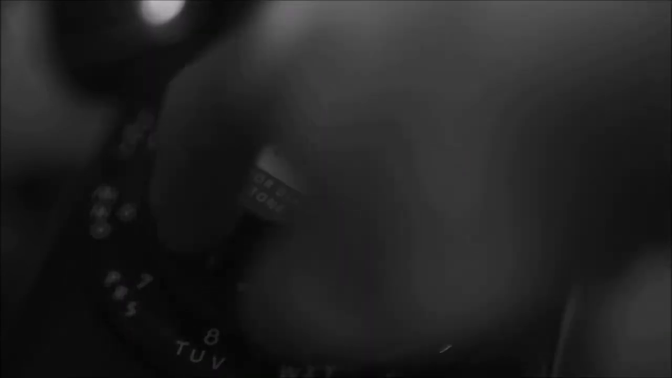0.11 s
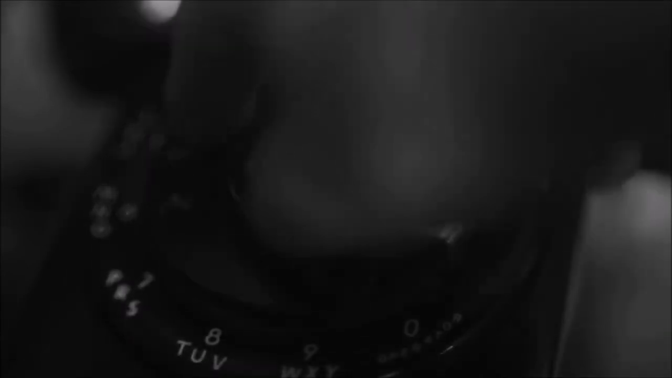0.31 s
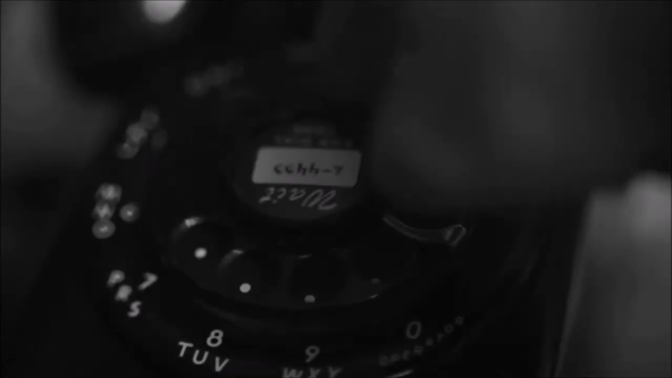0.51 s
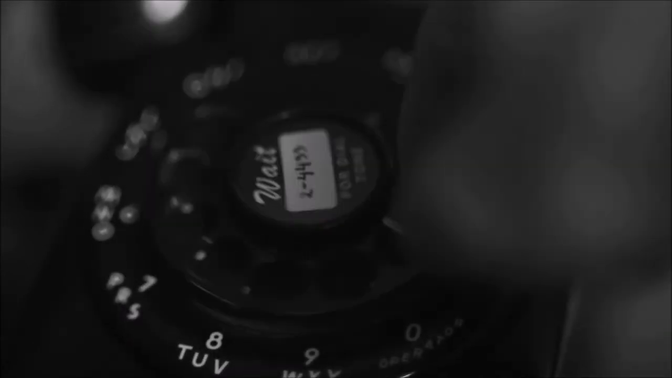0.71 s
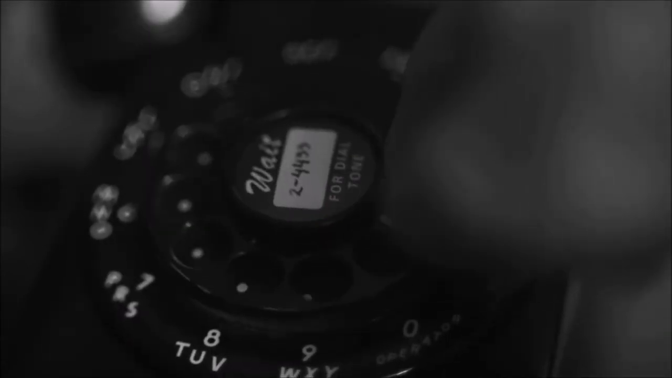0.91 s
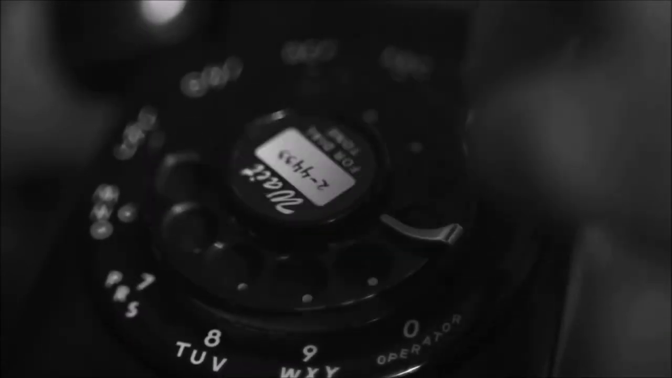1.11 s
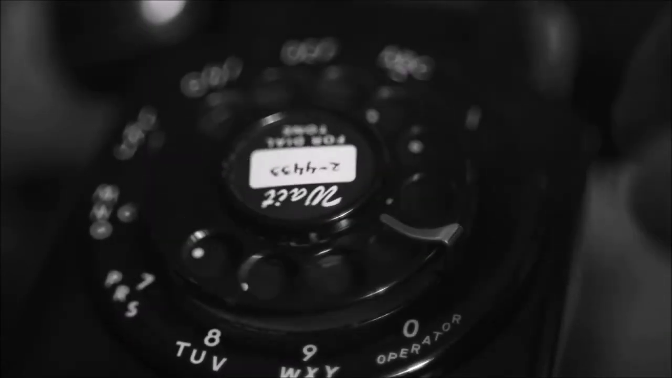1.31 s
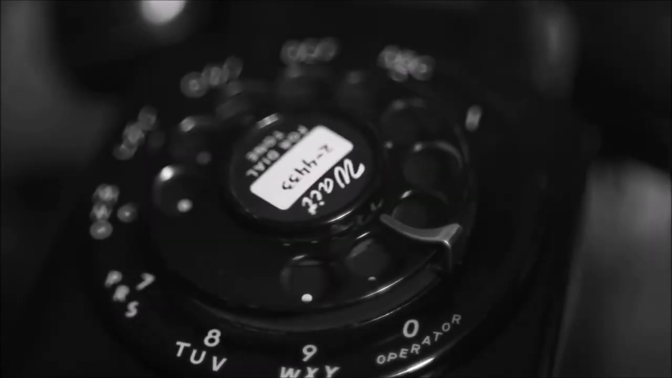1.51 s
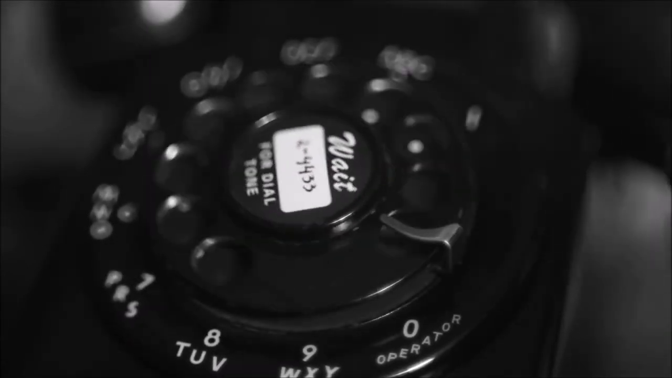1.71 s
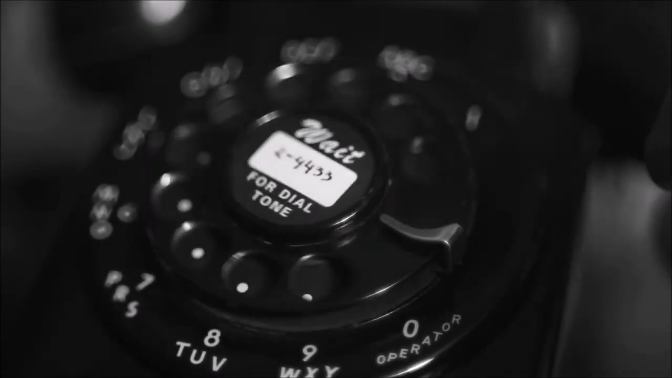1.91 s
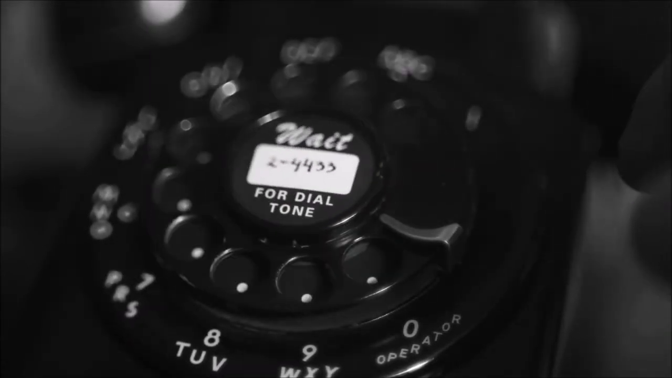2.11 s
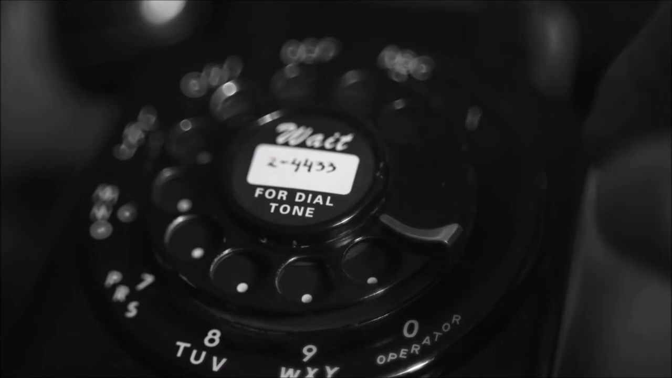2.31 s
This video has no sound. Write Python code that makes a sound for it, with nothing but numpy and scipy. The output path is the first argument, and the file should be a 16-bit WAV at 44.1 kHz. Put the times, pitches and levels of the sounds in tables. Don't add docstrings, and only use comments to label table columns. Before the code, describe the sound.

A rotary telephone dial heard very close in a small room: a finger winds it with rattling, quickening clicks, it cracks against the stop, then whirrs back with nine even clicks and a ringing metal clack.

```python
import sys
import numpy as np
from scipy import signal
from scipy.fft import rfft, irfft, next_fast_len
from scipy.io import wavfile
from scipy.ndimage import uniform_filter1d, map_coordinates

SR = 44100
rng = np.random.default_rng(int(sys.argv[2]) if len(sys.argv) > 2 else 0)


def attenuation_scalar(level_db):
    decades = np.asarray(level_db, float) / 20
    return 10 ** decades


def inscribe(sig):
    pcm = np.round(np.clip(np.atleast_2d(sig).T, -1, 1) * 32767)
    wavfile.write(sys.argv[1], SR, pcm.astype(np.int16))


N = 103635

# frequency in Hz, width in Hz, level in dB.
CASE = [(329, 91, -9), (423.5, 33, 3), (539.3, 40.3, 2.5), (652.4, 22.6, -4.5), (779, 36.6, -5)]
# frequency in Hz, width in Hz, level in dB.
PLATE = [(920, 470, -10), (1198, 184, -0.5), (1457, 67, -1), (1586, 82, -1), (1720, 72, 0), (1837, 67, 2.5),
         (2170, 197, -9.5), (2834, 440, -14)]
# frequency in Hz, level in dB per Hz.
SPRING = [(1200, -12.5), (2200, -1.5), (3550, -8), (6470, -0.5), (8190, -7.5), (8850, -4), (9740, -6),
          (12800, -5.5), (16000, -16)]


def unit(x):
    return x / np.sqrt(np.mean(x ** 2) + 1e-20)


def along(points, hz):
    f, v = np.transpose(points)
    return np.interp(np.log(hz + 1), np.log(f + 1), v)


def wobble(rate, count=N):
    knots = rng.standard_normal(int(count * rate / SR) + 4)
    return map_coordinates(knots, [np.arange(count) * rate / SR])


def filtered(x, response):
    m = next_fast_len(N + SR // 2)
    return irfft(rfft(x, m) * response(np.fft.rfftfreq(m, 1 / SR)), m)[:N]


def resonances(body):
    def response(f):
        total = 0
        for k, (centre, width, db) in enumerate(body):
            loss = 1j * f * width
            total = total + (-1) ** k * attenuation_scalar(db) * loss / (centre * centre - f * f + loss)
        return total
    return response


def coloured(spectrum):
    return unit(filtered(rng.standard_normal(N), lambda hz: attenuation_scalar(along(spectrum, hz))))


def bursts(events, rise_s, t60_s, chatter_db, chatter_s):
    blows, u = np.zeros(N), np.arange(SR // 3) / SR
    places = [min(round(e[0] * SR), N - 1) for e in events]
    np.add.at(blows, places, attenuation_scalar([e[1] for e in events]))
    rise = (1 - np.exp(-u / rise_s)) ** 2
    fall = attenuation_scalar(1.5 - 60 * u / t60_s) + attenuation_scalar(chatter_db - 60 * u / chatter_s)
    return signal.fftconvolve(blows, rise * fall)[:N]


def shimmer(spectrum, patchy_db):
    z = signal.stft(coloured(spectrum), nperseg=128)[2]
    field = uniform_filter1d(rng.standard_normal(z.shape), size=3, axis=0)
    field = uniform_filter1d(field, size=9, axis=1)
    x = signal.istft(z * attenuation_scalar(patchy_db * unit(field)), nperseg=128)[1][:N]
    return x / np.sqrt(np.abs(uniform_filter1d(x * x, size=70)) + 1e-9)


def clang(modes, uneven_db, blur):
    t = np.arange(N) / SR
    return sum(attenuation_scalar(db + uneven_db * wobble(90)) * np.sin(2 * np.pi * hz * t + blur * wobble(400))
               for hz, db in modes)


def background():
    # frequency in Hz, rms level in dB.
    hum_tones = [(120, -58), (180, -69.5)]
    # frequency in Hz, level in dB per Hz.
    room_noise = [(15, -48), (30, -22.5), (130, -17), (240, -18.5), (700, -23), (1100, -25.5),
                  (4000, -37.5), (15500, -48), (16500, -46)]
    t = np.arange(N) / SR
    hum = 0
    for hz, db in hum_tones:
        level = np.sqrt(2) * attenuation_scalar(db + 2.1 * wobble(15))
        hum = hum + level * np.sin(2 * np.pi * hz * t + 0.3 * wobble(7.1))
    return hum + attenuation_scalar(-55.5 - 1.0 + wobble(5.55)) * coloured(room_noise)


def walls(x):
    # frequency in Hz, t60 in seconds.
    room_decay = [(300, 0.28), (3000, 0.17), (8000, 0.18), (15000, 0.086)]
    hz, t, z = signal.stft(rng.standard_normal(SR // 3), SR, nperseg=128)
    fade = attenuation_scalar(-60 * t / along(room_decay, hz)[:, None])
    tail = signal.istft(z * fade, SR, nperseg=128)[1]
    delayed = np.pad(x, (130, 0))
    return signal.fftconvolve(delayed, tail / np.linalg.norm(tail))[:N]


def hand():
    # time in seconds, level in dB, pitch in Hz.
    thumps = [
        (0.029, -48, 40),
        (.085, -55, 40),
        (.13, -44, 40),
        (.215, -47, 40),
        (.285, -48, 45.6),
        (0.39, -36, 49),
    ]
    t = np.arange(N) / SR
    return sum(attenuation_scalar(db) * np.exp(-(2.5 * hz * (t - s)) ** 2) * np.cos(2 * np.pi * hz * (t - s))
               for s, db, hz in thumps)


def pawl():
    # time in seconds, peak in dB, how much the spring joins in in dB.
    rattles = [(.1285, -62, 1), (.141, -58, 4), (.157, -59, 2), (.178, -53, -3), (.185, -48, -2),
               (.234, -43.5, 2.5), (0.249, -39, -3), (.285, -39, -15), (0.311, -38, -4), (0.326, -35, -8),
               (.354, -37.5, -7), (.3845, -36.5, 1.5), (0.398, -39.5, 4), (0.402, -43, -3), (.452, -48, 4),
               (0.478, -41, 4.5), (.543, -44, 6), (.552, -44, -12), (0.567, -42.5, 5.5), (.631, -30, -17),
               (.641, -41, 0), (.685, -46, 2), (0.712, -29.5, -9), (0.722, -40.5, 1), (.734, -46, -5),
               (.7605, -41, -6), (0.7715, -37.5, 3), (0.78, -36.5, 3), (0.884, -36, -24), (.892, -52, 0),
               (0.957, -46.5, -15), (1.047, -52, -12), (1.092, -39, -15), (1.097, -50, -15),
               (1.223, -47.5, 0), (1.467, -49, -22), (1.586, -45.5, -4), (1.6996, -56, -10),
               (1.776, -52, 7), (1.95, -50, -6), (1.9745, -49, -8), (2.058, -62, 8)]
    # frequency in Hz, level in dB.
    pawl_modes = [(2000, -12), (4760, -7.5), (5600, -17), (6500, -11.5), (7400, -1.5), (7700, -7),
                  (9500, -16), (11200, -24)]

    def ticks(rows):
        return bursts(rows, rise_s=.0006, t60_s=.019, chatter_db=-20, chatter_s=.11)

    shaken = [(s, db + up) for s, db, up in rattles]
    dry_ticks = ticks(rattles) * clang(pawl_modes, uneven_db=3, blur=1.4)
    return dry_ticks + ticks(shaken) * shimmer(SPRING, patchy_db=3)


def gears():
    # time in seconds, gear effort in dB, hollow boom over it in dB.
    turning = [(0, -59, 1), (.12, -52.5, 0), (.2, -50.5, 5.5), (.38, -43.5, 0.2), (.48, -46.5, -1),
               (.58, -47, -9), (.68, -46, -1.5), (0.802, -42, -3.5), (.835, -63.5, 1), (.955, -54.5, -1),
               (0.992, -47, 5), (1.1, -46.5, 3), (1.3, -44, 1), (1.45, -46, 1.5), (1.65, -46, 0),
               (2.049, -46.5, 1.5), (2.08, -64, 9), (2.35, -109, -4)]
    # frequency in Hz, width in Hz, level in dB.
    steel_parts = [(4800, 260, 2), (5630, 103, 2), (6530, 164, 4), (7430, 160, 0.2), (9240, 660, -4),
                   (8730, 540, -13), (12500, 2400, -36)]
    s, effort, boom = np.transpose(turning)
    effort_db, boom_db = (np.interp(np.arange(N) / SR, s, c) for c in (effort, boom))
    shared = wobble(55.43)

    def teeth(rate):
        hits = (rng.random(N) < rate / SR) * rng.standard_normal(N)
        spread_db = 1.8 * np.minimum(rng.exponential(size=N), 3)
        return unit(hits * attenuation_scalar(spread_db))

    def part(body, teeth_per_s=3000):
        flutter_db = 1.8 * (0.41 * shared + 0.56 * wobble(59.99)) + 0.59 * wobble(10.04)
        return unit(filtered(teeth(teeth_per_s) * attenuation_scalar(flutter_db), resonances(body)))

    low = attenuation_scalar(boom_db - 2) * part(CASE) + part(PLATE)
    top = effort_db.max()
    treble_db = top + 1.22 * (effort_db - top) - 7.5 + 2.2 * wobble(24.6)
    return attenuation_scalar(effort_db) * low + attenuation_scalar(treble_db) * part(steel_parts, 1500)


def spring():
    # time in seconds, peak in dB.
    cam_snaps = [(0.09, -32.5), (0.2159, -21.5), (0.3002, -19.5), (0.374, -21.5), (0.4405, -20),
                 (0.5327, -19.5), (0.6207, -18.5), (0.6979, -18.5), (0.9999, -24.5), (1.1326, -20.5),
                 (1.251, -20.5), (1.3751, -20), (1.498, -20), (1.6236, -20), (1.7489, -21), (1.878, -19.5),
                 (2.0105, -21)]
    # seconds after the snap, level over it in dB.
    rebounds = [
        (-.004, -17.5),
        (.006, -17),
        (.011, -16),
        (.025, -17),
        (.036, -28),
    ]
    # frequency in Hz, level in dB per Hz.
    contact_hiss = [(8000, -29), (10500, 5), (11500, -3), (13000, 4), (14500, -10), (15800, -36),
                    (16500, -30)]
    # frequency in Hz, width in Hz, level in dB.
    blade_modes = [(2680, 430, -11), (4040, 270, -7.5), (5240, 360, -12), (6570, 260, 0.5),
                   (8920, 360, -3.5), (10940, 820, -4), (12930, 540, 0.5), (13800, 400, -7)]
    release_s = .98
    back = [e for e in cam_snaps if e[0] > release_s]
    again = []
    for s, db in back:
        for after, loss_db in rebounds:
            late, louder = rng.uniform(-1, 1, 2)
            again.append((s + after * (1 + late / 8), db + loss_db + 2 * louder))

    def snaps(rows):
        shiver = bursts(rows, .0008, .015, chatter_db=-13.5, chatter_s=0.21)
        return shiver + bursts(again, .0008, .015, chatter_db=-47, chatter_s=0.09)

    snap = attenuation_scalar(-10) * snaps(cam_snaps) * shimmer(SPRING, patchy_db=4.0)
    bright = attenuation_scalar(-19) * snaps(back) * shimmer(contact_hiss, patchy_db=8)
    strike = bursts(back + again, 0.00043, 0.01, -25.5, 0.081) * np.sign(rng.standard_normal(N))
    blade = attenuation_scalar(4) * filtered(strike, resonances(blade_modes))
    nudge = bursts(cam_snaps, 0.0029, 0.068, -41, 0.096) * rng.standard_normal(N)
    return snap + bright + blade + attenuation_scalar(-2.5) * filtered(nudge, resonances(CASE))


def wheel():
    # time in seconds, crack in dB, ping of the finger stop over it in dB.
    stops = [(0.0896, -40, -18), (0.7918, -22, 7), (0.8057, -35, 3), (0.8068, -28, -3), (.8255, -40, -15),
             (0.9688, -34, -8), (0.9746, -45, -6), (2.0647, -18.5, -6), (2.0665, -21, 7), (2.08, -34, 8),
             (2.14, -50, -1)]
    # frequency in Hz, level in dB.
    crack_modes = [(1830, -8), (3100, -14), (4750, -19), (5500, -7), (5950, -1), (6500, -6), (13100, -20)]
    # frequency in Hz, level in dB per Hz.
    splash = [(1000, -12), (2500, -4), (4000, -8), (6500, 0), (9500, -4), (11500, -8), (13200, -5),
              (15500, -16), (16500, -30)]
    # frequency in Hz, level in dB.
    ping_modes = [(7150, -1.5), (7450, 1), (7700, -5.5), (9050, -11)]
    # frequency in Hz, level in dB, t60 in seconds.
    wheel_modes = [(3200, -20, .15), (5609, -23, 0.6), (5992, -19, 0.09), (6089, -24, .14),
                   (7036, -16, 0.11), (7500, -7, .1), (7585, -7, .17), (7690, -3, .1), (7750, -2, 0.07),
                   (8452, -13, 0.36), (9318, -16, .09), (9545, -14, 0.13), (11710, -33, .12),
                   (13200, -22, 0.12)]
    case_knock_db = [-15, -9, -20, -18, -20, -17, -23, -38, -6, -25, -14]
    plate_knock_db = [6, -12.5, -12, -12, -16, 2, -4, -14, -10.5, -18, 6]

    steel = clang(crack_modes, uneven_db=3.0, blur=1.1) + attenuation_scalar(-9) * coloured(splash)
    out = bursts(stops, .0007, .015, -45.0, 0.27) * steel
    pings = [(s, db + up) for s, db, up in stops]
    out += bursts(pings, .0007, .014, -33, 0.094) * clang(ping_modes, uneven_db=0.0, blur=.8)
    for body, knock_db in (CASE, case_knock_db), (PLATE, plate_knock_db):
        knocks = [(e[0], e[1] + k) for e, k in zip(stops, knock_db)]
        rough = shimmer([(100, -36), (300, 0), (3500, 0), (9000, -22)], patchy_db=-6.5)
        push = bursts(knocks, .0005, 0.014, -18, 0.093) * rough
        out += attenuation_scalar(11.5) * filtered(push, resonances(body))
    out = filtered(out, lambda hz: 1 / (1 + (250 / (hz + 1)) ** 4))

    home_s = 2.0655
    t = np.maximum(np.arange(N) / SR - home_s, 0)
    ring = 0
    for hz, db, t60 in wheel_modes:
        beating_db = 6 * (t60 < 1 / 4) * wobble(130)
        ring = ring + attenuation_scalar(db - 60 * t / t60 + beating_db) * np.sin(2 * np.pi * (hz * t + rng.random()))
    return out + attenuation_scalar(-30) * (1 - np.exp(-t / 0.00044)) * ring


def scene():
    clicks, blows, whirr = spring() + pawl(), wheel(), gears()
    wet = attenuation_scalar(-12) * (walls(clicks) + walls(blows)) + attenuation_scalar(-14) * walls(whirr)
    return (clicks + blows + whirr + wet + hand() + background())[None]


def low_pass(x):
    return signal.sosfilt(signal.butter(12, 16810, fs=SR, output="sos"), x)


def record(dry):
    mix = filtered(dry[0], lambda hz: 1 / (1 + (hz / 15900) ** 120))[None]
    return low_pass(mix)


dry = scene()
out = record(dry)
inscribe(out)
```